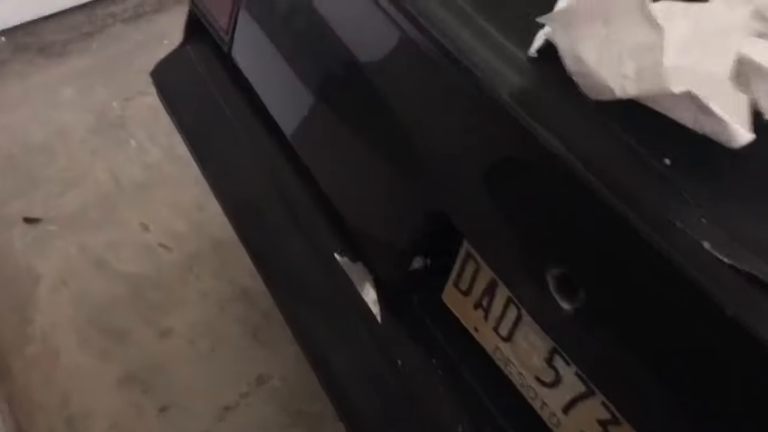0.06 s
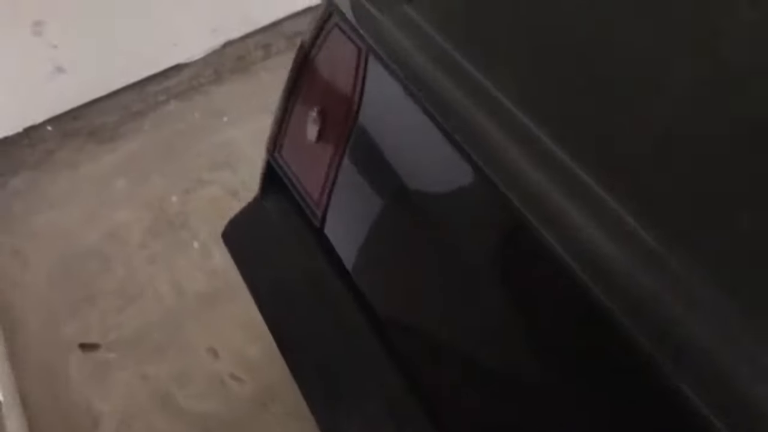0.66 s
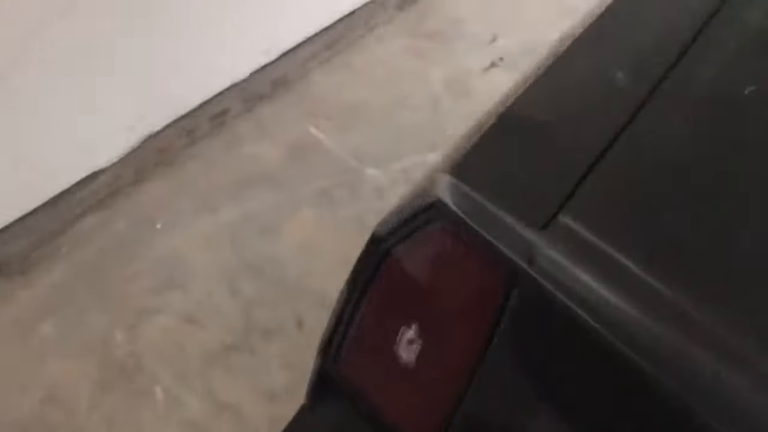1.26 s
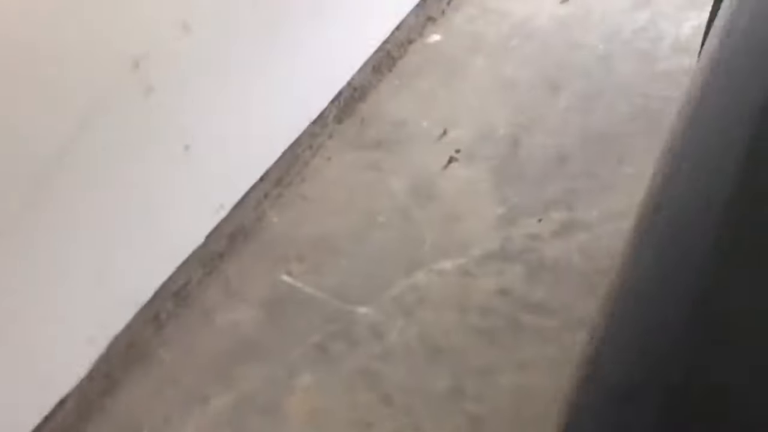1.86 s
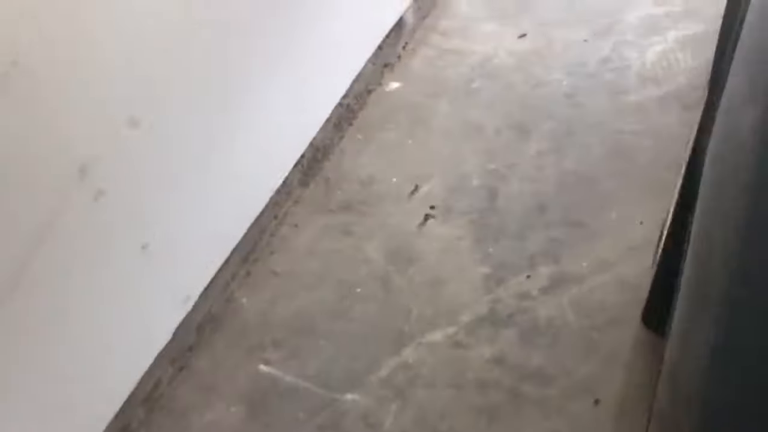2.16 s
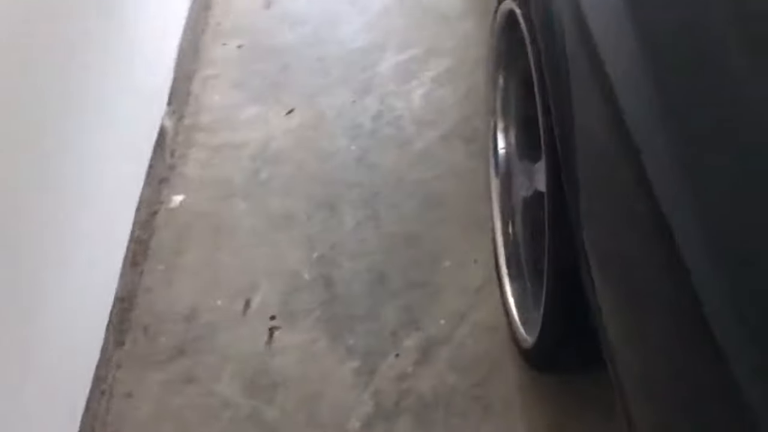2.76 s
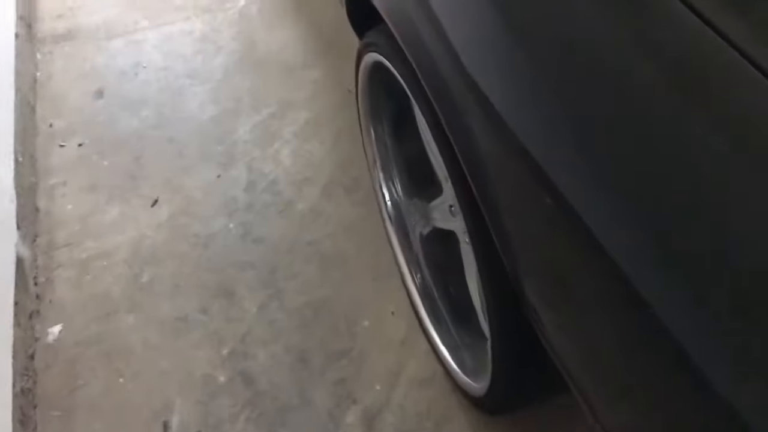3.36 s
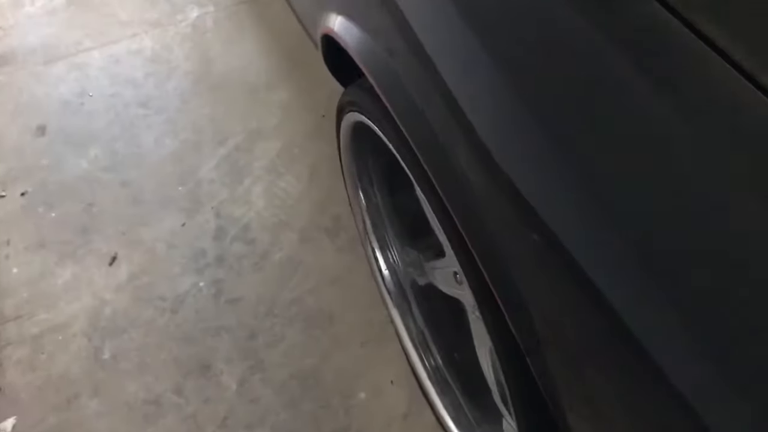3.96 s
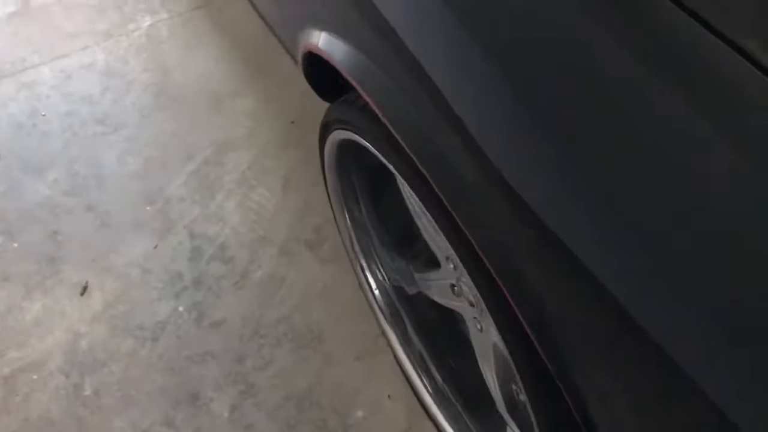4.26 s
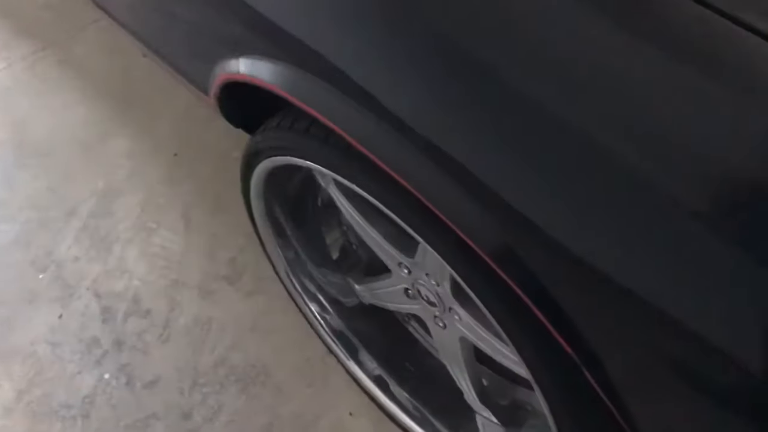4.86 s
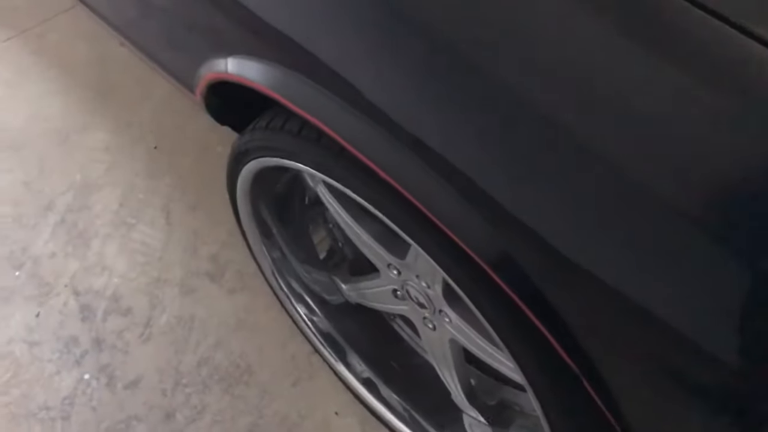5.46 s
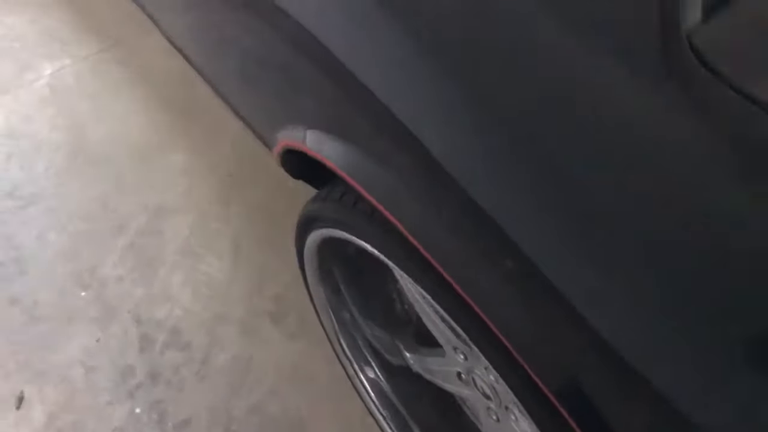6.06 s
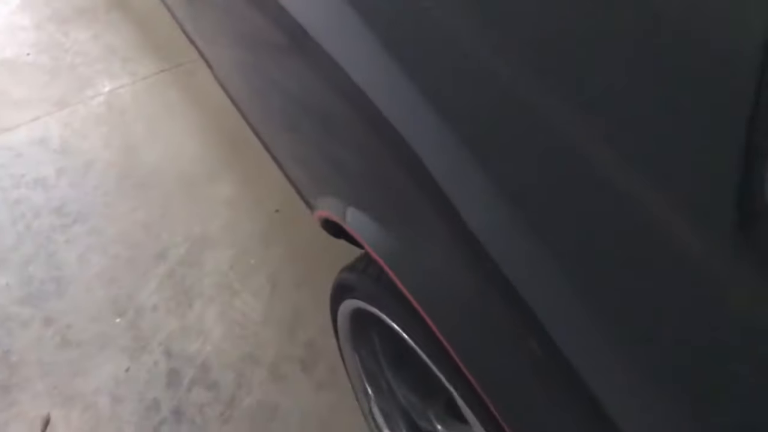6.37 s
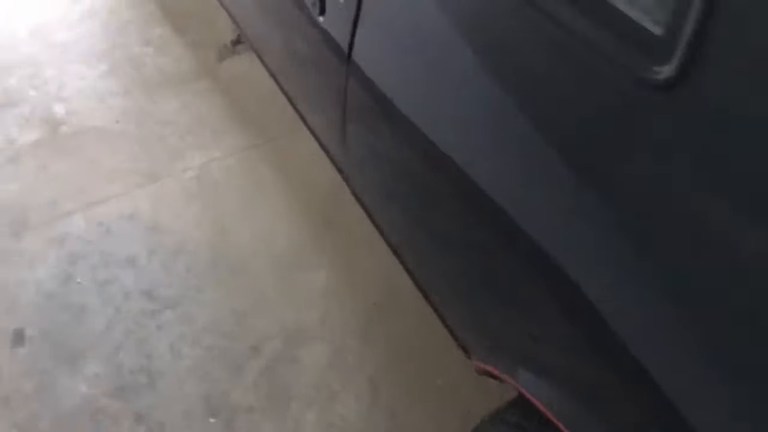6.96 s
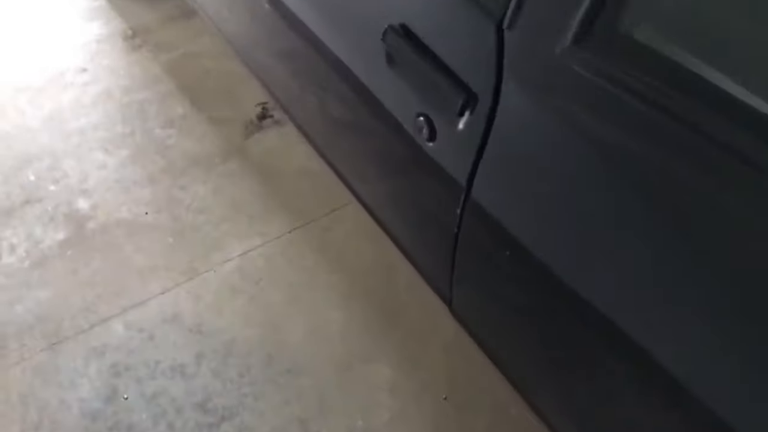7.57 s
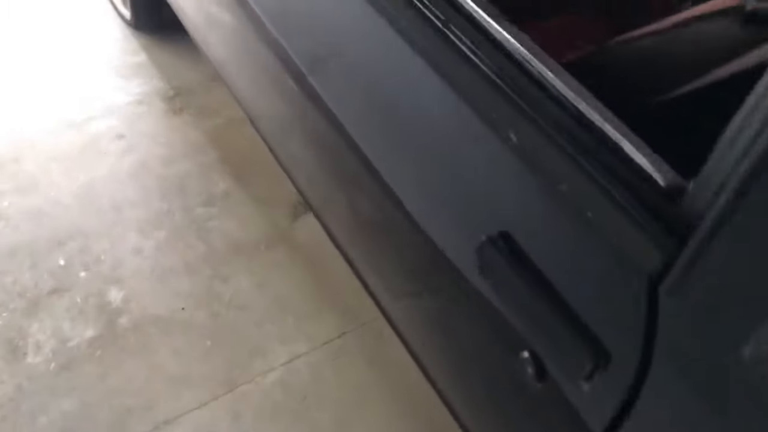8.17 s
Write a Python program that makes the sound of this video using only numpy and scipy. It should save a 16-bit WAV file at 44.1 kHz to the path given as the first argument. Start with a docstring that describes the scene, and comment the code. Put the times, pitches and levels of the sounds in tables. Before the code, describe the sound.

A big V8 car engine idles throughout in a concrete garage, heard close up on a walk from the tail along the side. The main sound is a deep, loping exhaust throb, nearly five beats a second, with every second beat burbling slightly more. Each beat carries a soft puff of hiss and a faint steel buzz from the tailpipe, followed by short garage reverberation. At about 0.4 seconds the tailpipe gives one brief, light rattle. The exhaust thumps and mechanical clatter are strongest at the start and ease over the first 2 seconds, leaving a clear, even low boom. Valve ticking and fan rush continue quietly underneath. The faint burble recedes around 2 to 4 seconds and returns from about 4.5 to 6.5 seconds. The idle holds its slow, steady pace until the end at about 8 seconds.

```python
"""A deep, loping throb: a big V8 idles at about 560 rpm in a concrete garage, heard on a walk from its
tail along its side. In each cycle of eight firings a few strong ones bunch together, so the exhaust
booms in its low modes and spits a puff of turbulent hiss; every second throb burbles more strongly.
The gas sets the tailpipe's steel buzzing, and once, early on, rattling. The garage reverberates after
every throb, and valve gear and fan clatter steadily underneath."""
import sys
import numpy as np
from scipy import signal
from scipy.fft import rfft, irfft, next_fast_len
from scipy.io import wavfile
from scipy.ndimage import uniform_filter1d, minimum_filter1d

SR = 44100
rng = np.random.default_rng(int(sys.argv[2]) if len(sys.argv) > 2 else 0)


def transcribe(u):
    """Save the signal u as a 16-bit wav file named by the first command-line argument.

    u: samples, shape (n,) or (channels, n), limited to [-1, 1]; the rate is SR.
    q: integer samples, one column per channel.
    """
    v = np.clip(np.atleast_2d(u).T, -1, 1)
    q = np.round(v * 32767).astype(np.int16)
    wavfile.write(sys.argv[1], SR, q)


N = 362055

# relative strengths of the eight firings of a cycle: thump_db, puff_db
FIRING_LEVELS = [(-0.5, 4), (-1, 7), (1.5, 5), (1, -34), (-1.5, -2.5), (-6.5, -10), (-11, -18), (-7, -31)]


def amp(db):
    """Amplitude ratio of a level in decibels."""
    return 10 ** (np.asarray(db) / 20)


def unit(x):
    """Normalisation to an rms of 1."""
    return x / np.sqrt(np.mean(x ** 2) + 1e-20)


def at_frequency(curve, hz):
    """Interpolation on a log-frequency axis."""
    knots_hz, values = np.transpose(curve)
    return np.interp(np.log(hz + 1), np.log(knots_hz), values)


def at_time(curve, s):
    """Linear interpolation in time."""
    return np.interp(s, *np.transpose(curve))


def add(mix, start_s, sound):
    """Superposition of a sound whose onset may lie before time zero."""
    at = int(round(start_s * SR))
    sound = sound[max(-at, 0):]
    part = mix[max(at, 0):][:len(sound)]
    part += sound[:len(part)]


def train(times, db, shape):
    """A pulse train: one copy of the shape at every time, each at its own level."""
    out = np.zeros(N)
    for start_s, gain in zip(times.ravel(), amp(db).ravel()):
        add(out, start_s, gain * shape)
    return out


def swell(t, peak_s, sharpness):
    """A gamma envelope: it rises to 1 at the peak and decays more slowly."""
    return (t / peak_s * np.exp(1 - t / peak_s)) ** sharpness


def colour(x, spectrum):
    """Zero-phase filtering by a gain curve in decibels."""
    size = next_fast_len(N, True)
    gain = amp(at_frequency(spectrum, np.fft.rfftfreq(size, 1 / SR)))
    return irfft(rfft(x, size) * gain, size)[:N]


def resonate(x, hz, width_hz):
    """A damped resonator with a gain near 1 at resonance."""
    radius = np.exp(-np.pi * width_hz / SR)
    pole = radius * np.exp(2j * np.pi * hz / SR)
    return 2 * signal.lfilter([1 - radius], [1, -pole], x).real


def ring(x, modes):
    """Modal sum: each mode is two resonators in series, scaled so that its level sets its energy."""
    return sum(amp(db) / np.sqrt(width) * resonate(resonate(x, hz, width), hz, width)
               for hz, width, db in modes)


def cycles():
    """Four-stroke cycles, two crank turns each: start times and side of the lope (-1 clean, +1 burbling)."""
    # the idle hunts about its set speed: time_s, speed_rpm
    idle_speed = [(0.0, 572.7), (0.4, 548.2), (0.85, 575.1), (1.05, 548.9), (1.7, 564.8), (1.9, 557.4),
                  (3.0, 569.2), (4.25, 550.4), (4.5, 561.2), (5.35, 562.1), (5.55, 555.7), (6.4, 569.9),
                  (6.6, 551.9), (7.9, 562.5)]
    starts = [-0.009]
    while starts[-1] < N / SR:
        starts.append(starts[-1] + 2 * 60 / at_time(idle_speed, starts[-1]))
    return np.array(starts[:-1]), -(-1.) ** np.arange(len(starts) - 1)


def firing_times(jitter_s):
    """Quasi-periodic firing: eight evenly spaced times per cycle (one row), with random jitter."""
    starts, _ = cycles()
    periods = np.append(np.diff(starts), np.diff(starts).mean())
    times = starts[:, None] + periods[:, None] * np.arange(len(FIRING_LEVELS)) / len(FIRING_LEVELS)
    return times + jitter_s * rng.standard_normal(times.shape)


def throb_levels(curve, lope_db, chance_db):
    """Amplitude modulation by cycle, in dB: place on the walk, alternation of the lope, and chance."""
    starts, side = cycles()
    return at_time(curve, starts) + lope_db * side + chance_db * rng.standard_normal(len(starts))


def puffs(cycle_db, decay_s, spread_db):
    """Pulsating flow: each firing releases a short burst of gas."""
    times = firing_times(jitter_s=0.0037)
    t = np.arange(0, .08, 1 / SR)
    db = np.array(FIRING_LEVELS)[:, 1] + cycle_db[:, None] + spread_db * rng.standard_normal(times.shape)
    return train(times, db, (1 - np.exp(-t / 0.00086)) * np.exp(-t / decay_s))


def walk_gains():
    """Level depends on the listener's position: gains per sample for the thumps and the clatter."""
    # relative levels along the walk: time_s, thump_db, clatter_db
    walk_levels = [(0, -12, -31), (0.8, -14.5, -35), (1.5, -17, -34), (2.2, -19.5, -39), (3.8, -20, -38.5),
                   (5.6, -19, -39.5), (7.3, -19, -39), (8.2, -17.5, -37.5)]
    time_s, *levels = np.transpose(walk_levels)
    return [amp(np.interp(np.arange(N) / SR, time_s, db)) for db in levels]


def reverberant_noise(flow, wet_db, patchy_db):
    """Turbulent noise follows the flow; its diffuse field in the garage decays exponentially by band."""
    # the garage's reverberation time: frequency_hz, t60_s
    reverb_times = [(100, 0.42), (700, 1), (2000, 0.61), (5000, 0.44), (9000, 0.24), (15000, 0.12)]
    hop = 64
    power = np.pad(uniform_filter1d(flow ** 2, hop)[::hop], (0, 4), "edge").clip(0)
    t60_s = at_frequency(reverb_times, np.fft.rfftfreq(4 * hop, 1 / SR))
    retention = np.exp(-2 * np.log(1000) * hop / (t60_s * SR))
    echo = np.transpose([signal.lfilter([1 - kept], [1, -kept], power) for kept in retention])
    real, imag, patches = rng.standard_normal((3, *echo.shape))
    patches = uniform_filter1d(patches, size=90, axis=0)
    patches = unit(uniform_filter1d(patches, size=4, axis=1))  # the colour drifts slowly, over a tenth of a second or so
    magnitude = np.sqrt(power[:, None] + amp(wet_db) ** 2 * echo) * amp(patchy_db * patches)
    spectra = (real + 1j * imag) * magnitude
    return unit(signal.istft(spectra.T, nperseg=4 * hop, noverlap=3 * hop)[1][:N])


def early_reflections(x):
    """Comb filtering: delayed copies interfere with the direct sound as their paths slowly change."""
    # paths by floor, car and walls: start_delay_s, end_delay_s, gain
    paths = [(.0047, .0049, .13), (.0083, .0080, -.14), (.0131, .0134, .15), (.0197, .0194, -.14)]
    at = np.arange(N)
    echoes = sum(gain * np.interp(at - SR * np.linspace(start_s, end_s, N), at, x, left=0)
                 for start_s, end_s, gain in paths)
    return x.std() * unit(x + echoes)


def standing_waves(knocking, gas_db):
    """Room modes, driven by knocks and gas puffs, swell as the listener passes their antinodes."""
    # the modes: pitch_hz, width_hz, level_db, strongest_s, spread_s
    room_modes = [(555.8, 18, -44.5, 5.2, 2.9), (671, 20, -46, 3.7, 0.65), (860, 280, -43.5, 0.13, 0.57)]
    t, out = np.arange(N) / SR, np.zeros(N)
    gas = unit(puffs(np.zeros_like(cycles()[0]), decay_s=0.028, spread_db=2.0))
    drive = knocking + amp(gas_db) * gas * rng.standard_normal(N)
    for hz, width_hz, db, strongest_s, spread_s in room_modes:
        nearness = np.exp(-((t - strongest_s) / spread_s) ** 2)
        out += amp(db) * nearness * unit(ring(drive, [(hz, width_hz, 0)]))
    return out


def clatter(tick_db, rush_db, panel_db):
    """Impact excitation: valve gear ticks over the fan's rush and rings panels and room modes."""
    # spectral density of the rush: frequency_hz, level_db
    rush_spectrum = [(15, -2), (33, 17.5), (90, 15.5), (180, 8), (290, 13), (370, -3.5), (490, -3),
                     (600, 3.5), (800, -0.5), (1300, -7.5), (2500, -10), (4500, -13), (7000, -15),
                     (10000, -20), (15500, -24.5)]
    # modes of the engine and body panels: pitch_hz, width_hz, level_db
    panel_modes = [(610, 35, 0), (688, 25, -4.5), (747.7, 37, 7), (836, 160, 2.5), (1100, 15, -30),
                   (1139, 12.5, -6)]
    times = firing_times(jitter_s=.003)
    times = np.array([times, times + np.diff(times).mean() / 2])  # two ticks per firing
    t = np.arange(0, .015, 1 / SR)
    db = 0.33 * np.array(FIRING_LEVELS)[:, 0] + 2.4 * rng.standard_normal(times.shape)
    ticks = unit(train(times, db, np.exp(-t / 0.006)))
    rush = colour(reverberant_noise(1 + amp(tick_db) * ticks, wet_db=-8, patchy_db=1.5), rush_spectrum)
    knocking = reverberant_noise(ticks, wet_db=-0.5, patchy_db=2)
    engine = amp(rush_db) * unit(rush) + amp(panel_db) * unit(ring(knocking, panel_modes))
    _, clatter_gain = walk_gains()
    return clatter_gain * engine + standing_waves(knocking, gas_db=8)


def hiss(level_db):
    """Jet noise: the turbulent puffs fill the garage with a pulsing chuff."""
    # spectral density of the escaping gas: frequency_hz, level_db
    gas_spectrum = [(300, 6), (700, 9), (1300, 2), (2900, -1), (3700, 0.5), (4400, 0.5), (4900, -3),
                    (5500, 0), (7400, -2.5), (9600, -0.5), (10400, -6), (11500, -2.5), (15500, -6.5)]
    # relative hiss along the walk: time_s, level_db
    hiss_levels = [(0, 1), (0.65, 3.5), (2.2, 0.7), (3.3, -0.5), (4.1, 1.3), (6.6, -0.5), (8.2, 0.5)]
    flow = puffs(throb_levels(hiss_levels, lope_db=-0.6, chance_db=0.13), decay_s=0.025, spread_db=0.35)
    turbulence = reverberant_noise(flow, wet_db=22, patchy_db=2.0)
    return amp(level_db) * unit(colour(turbulence, gas_spectrum))


def tailpipe_buzz(level_db):
    """Forced vibration: the puffs drive the tailpipe's steel, and one harder burst rattles it."""
    # modes of the steel: pitch_hz, width_hz, level_db
    steel_modes = [(1586, 38, -7), (1666, 44, -12), (1859, 54, -1), (1953, 116, 4), (2267, 56, -10.5),
                   (3610, 88, -9.5), (4617, 120, -10), (5390, 200, -10)]
    # relative buzz along the walk: time_s, level_db
    buzz_levels = [(0, 5), (1.05, 0.5), (1.5, 3), (2.7, -2), (3.2, 1), (4.5, 1), (5.2, -4), (6.15, 0.6),
                   (8.2, -1.5)]
    rattle_s, rattle_db, rattle_decay_s = 0.416, 14.5, 0.055
    levels = throb_levels(buzz_levels, lope_db=0.1, chance_db=2.2)
    flow = unit(puffs(levels, decay_s=.018, spread_db=.8))
    t = np.arange(0, 2 * rattle_decay_s, 1 / SR)
    add(flow, rattle_s, amp(rattle_db) * np.exp(-t / rattle_decay_s))
    turbulence = reverberant_noise(flow, wet_db=4.5, patchy_db=0.75)
    return amp(level_db) * unit(ring(turbulence, steel_modes))


def burble(pitch_hz, roughness, level_db):
    """Amplitude modulation roughens a higher pipe mode late in the throb, most in every second cycle."""
    # relative burble along the walk: time_s, level_db
    burble_levels = [(0, 3), (1.45, 4), (2.3, -5.5), (3.65, -10), (4.5, 0.5), (5.35, 0.5), (5.75, -4),
                     (6.2, 2.5), (7.3, -9.5), (8.2, -3)]
    t, out = np.arange(0, .3, 1 / SR), np.zeros(N)
    envelope = swell(t, peak_s=0.06, sharpness=1.93)
    starts, _ = cycles()
    levels = throb_levels(burble_levels, lope_db=3, chance_db=0.5)
    for start_s, db, (detune, phase) in zip(starts, levels, rng.random((len(starts), 2))):
        hz = pitch_hz * (1 + 0.03 * (detune - .5))
        add(out, start_s + .04, amp(db) * envelope * np.sin(2 * np.pi * (hz * t + phase)))
    flutter = unit(ring(rng.standard_normal(N), [(28.7, 82, 0)]))  # the uneven firings shake the tone
    return amp(level_db) * unit(out * (1 + roughness * flutter))


def thumps(spread_db, roughness, lead_s, gain_db):
    """Pipe resonance: just ahead of its gas, each firing drives the modes with a pulse and a gust."""
    # modes of the exhaust and garage: pitch_hz, width_hz, level_db
    pipe_modes = [(95.2, 12.7, 13), (129, 20.2, 1), (164.2, 10.3, -5.5), (220, 14.5, -17), (234.3, 18, -16),
                  (256.7, 8.8, -32), (294.3, 38, -20.5)]
    times = firing_times(jitter_s=0.0008) - lead_s
    t = np.arange(0, .04, 1 / SR)
    db = np.array(FIRING_LEVELS)[:, 0] + spread_db * rng.standard_normal(times.shape)
    pulses = train(times, db, np.exp(-t / 0.00041))
    gusts = train(times, db, np.exp(-t / 0.0053)) * rng.standard_normal(N)
    ringing = unit(ring(pulses, pipe_modes)) + roughness * unit(ring(gusts, pipe_modes))
    thump_gain, _ = walk_gains()
    return amp(gain_db) * thump_gain * unit(ringing)


def boom(crest_s, octave_db, level_db):
    """Resonance: bunched firings swing the exhaust's lowest mode, which glides up to a garage mode."""
    # relative boom along the walk: time_s, level_db
    boom_levels = [(0, -2.2), (0.4, -2), (1.5, -0.3), (3.0, -0.1), (5.0, -0.8), (8.2, -1)]
    exhaust_hz, garage_hz, glide_at_s, glide_s, length_s = 59.35, 60.14, 0.083, 0.027, 0.23
    t, out = np.arange(0, length_s, 1 / SR), np.zeros(N)
    envelope = swell(t, peak_s=0.067, sharpness=2.72) * (1 - (t / length_s) ** 6)
    glide = (1 + np.tanh((t - glide_at_s) / glide_s)) / 2
    turns = np.cumsum(exhaust_hz + (garage_hz - exhaust_hz) * glide) / SR
    turns -= np.interp(crest_s, t, turns)  # a pressure crest falls at crest_s
    starts, _ = cycles()
    levels = throb_levels(boom_levels, lope_db=-0.32, chance_db=0.7)
    for start_s, db, (detune, tilt, skew) in zip(starts, levels, rng.standard_normal((len(starts), 3))):
        swing = amp(db) * envelope * np.exp(3 * tilt * (t - crest_s))
        phase = 2 * np.pi * turns * (1 + .016 * detune)
        steepening = amp(octave_db) * swing ** 2 * np.cos(2 * phase + skew)  # strong waves gain an octave
        add(out, start_s, swing * np.cos(phase) + steepening)
    return amp(level_db) * unit(out)


def scene():
    """Superposition in mono: the low exhaust tones, plus the noisier sources with their reflections."""
    exhaust = boom(crest_s=.073, octave_db=-20.0, level_db=-8.5)
    exhaust += thumps(spread_db=2.0, roughness=0.55, lead_s=0.012, gain_db=-1.34)
    exhaust += burble(pitch_hz=277.3, roughness=0.45, level_db=-38.0)
    noises = hiss(level_db=-37) + tailpipe_buzz(level_db=-40.5)
    noises += clatter(tick_db=-11.5, rush_db=4.5, panel_db=-7.0)
    return (exhaust + early_reflections(noises))[None]


def record(dry):
    """Peak limiting holds the loudest swings at full scale; a low-pass filter then limits the band."""
    allowed_gain = 1 / np.maximum(abs(dry), 1)
    gain = uniform_filter1d(minimum_filter1d(allowed_gain, size=300), size=300)
    lowpass = signal.firwin(1023, 15600, window=("kaiser", 9), fs=SR)
    return signal.oaconvolve(dry * gain, lowpass[None], "same")


dry = scene()
out = record(dry)
transcribe(out)
```